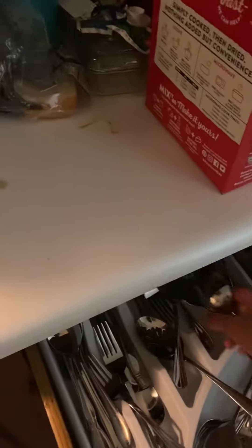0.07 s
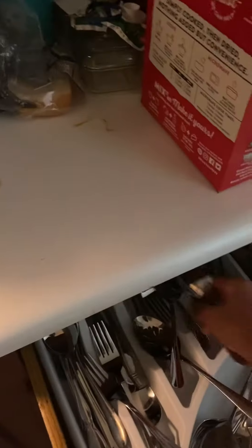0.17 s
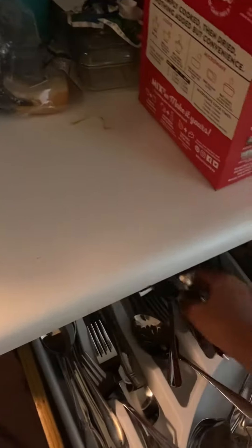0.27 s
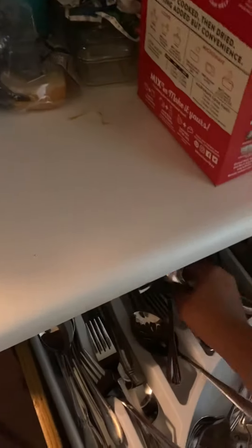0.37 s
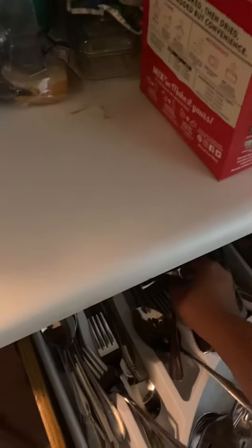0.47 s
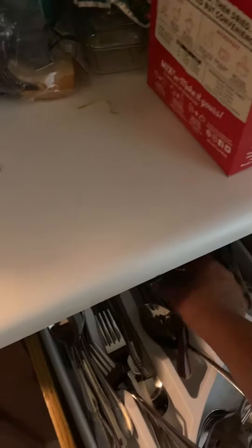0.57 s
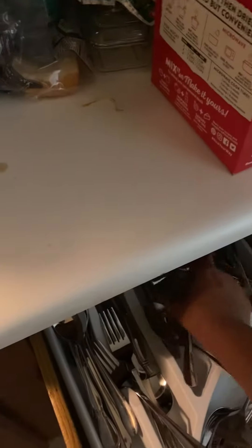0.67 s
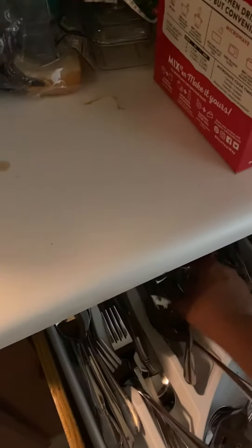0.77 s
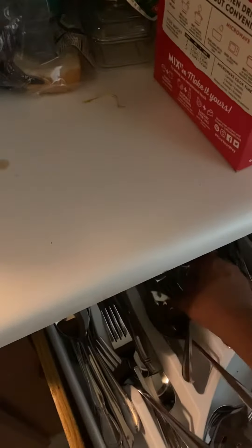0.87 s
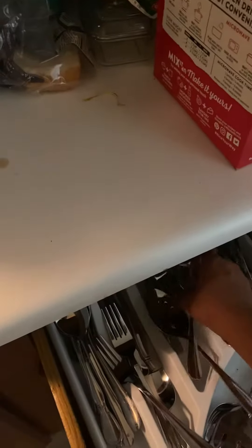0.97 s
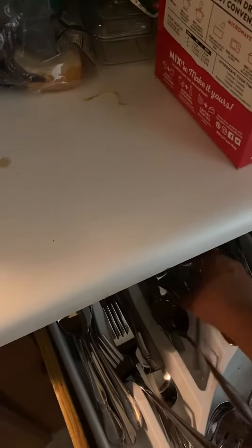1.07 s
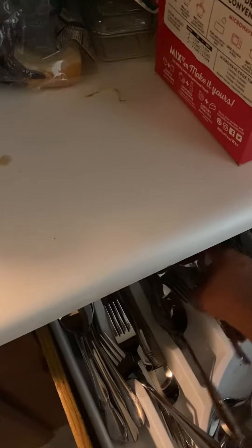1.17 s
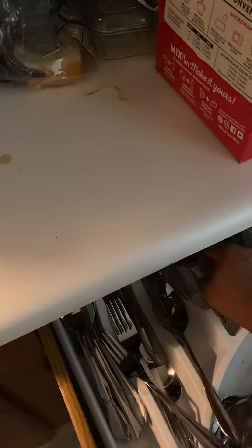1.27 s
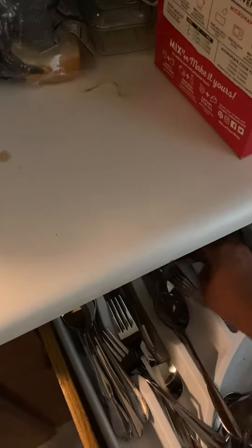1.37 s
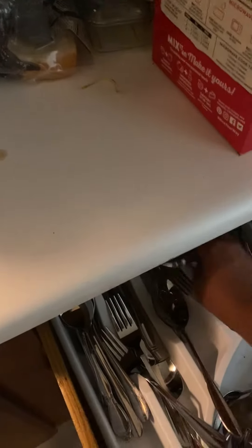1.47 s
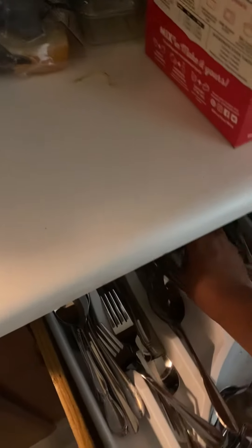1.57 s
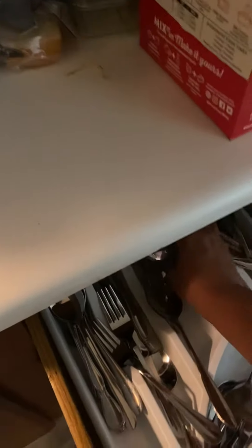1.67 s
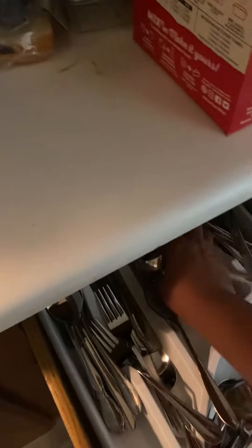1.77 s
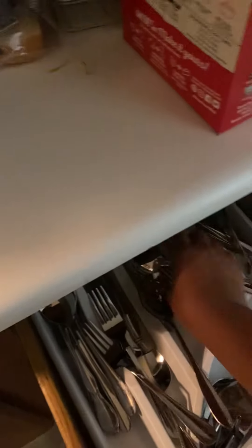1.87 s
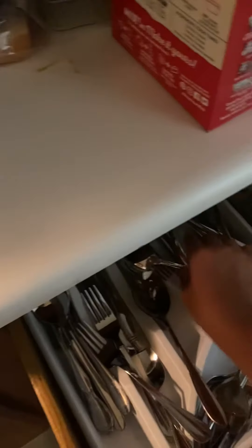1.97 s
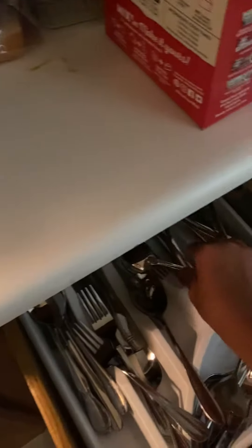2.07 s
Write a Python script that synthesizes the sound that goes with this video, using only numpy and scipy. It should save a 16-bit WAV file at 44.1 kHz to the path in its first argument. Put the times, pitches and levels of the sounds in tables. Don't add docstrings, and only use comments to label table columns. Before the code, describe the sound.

Cutlery rummaged in a drawer, close and bright. Faint sliding until 0.2 s, then a ringing piece and a sharp burst of clinks at 0.25-0.3 s. Lighter clinks and dull plastic tray knocks thin out, with an accent at 0.86 s. Clinking gathers from 1.1 s; the heavy flurry runs 1.55-1.83 s, then near-quiet and small clinks around 2.1 s. Low drawer wobble, short room reflections, faint fridge hum and hiss.

```python
import sys
import numpy as np
from scipy import signal
from scipy.fft import rfft, irfft, next_fast_len
from scipy.io import wavfile
from scipy.ndimage import uniform_filter1d, map_coordinates

SR = 44100
rng = np.random.default_rng(int(sys.argv[2]) if len(sys.argv) > 2 else 0)


def generate_wav(sig):
    pcm = np.round(np.clip(np.atleast_2d(sig).T, -1, 1) * 32767).astype(np.int16)
    wavfile.write(sys.argv[1], SR, pcm)


def boost_factor(decibels):
    exponent = np.asarray(decibels, float) / 20
    return 10 ** exponent


N = 94815

# start_s, peak_db, loudest_mode_hz, chatter_t60_s
EARLY_CLINKS = [(0.0107, -38, 5680, 0.11), (0.2476, -8.5, 3780, 0.08), (0.2629, -5, 6440, 0.11),
                (0.2771, -10.5, 6600, 0.18), (0.2955, -11.5, 6574, 0.1), (0.3215, -19.5, 4050, 0.042),
                (0.4173, -19.5, 5350, 0.04), (0.4578, -18.5, 7450, 0.05), (0.5217, -16.5, 5840, 0.21),
                (0.5807, -20, 6550, 0.12), (0.6282, -23, 5870, 0.11), (0.6435, -23, 5120, 0.17),
                (0.6953, -23.5, 7600, 0.06), (.715, -24.5, 5900, .15), (0.7906, -26.5, 6580, 0.16),
                (0.8387, -29, 5770, 0.28), (0.8623, -13.5, 6700, 0.11), (0.8834, -26, 6840, 0.22),
                (0.9986, -19.5, 5880, 0.12)]
# start_s, peak_db, loudest_mode_hz, chatter_t60_s
LATE_CLINKS = [(1.0939, -23.5, 4130, 0.063), (1.133, -18, 6560, 0.074), (1.152, -18.5, 5420, 0.077),
               (1.1835, -17.5, 3760, 0.032), (1.2778, -32.5, 6670, 0.016), (1.295, -20, 5000, 0.082),
               (1.3013, -15.5, 6030, 0.14), (1.316, -12.5, 5850, 0.034), (1.386, -20.5, 5300, 0.17),
               (1.409, -24, 5300, 0.14), (1.439, -18.5, 5220, 0.026), (1.465, -19, 5150, 0.062),
               (1.503, -17.5, 2710, 0.039), (1.508, -18, 6870, 0.25), (1.525, -24, 6800, 0.075),
               (1.548, -13.5, 6050, 0.22), (1.5552, -13.5, 3360, 0.078), (1.6087, -21.5, 7540, 0.049),
               (1.6577, -26, 3680, 0.61), (1.6849, -15, 5470, 0.13), (1.7056, -13, 5770, 0.22),
               (1.741, -12.5, 4420, 0.2), (1.7905, -10, 6620, 0.14), (1.808, -6, 5680, 0.073),
               (1.8277, -11, 5300, 0.043), (2.008, -48, 4230, 0.06), (2.098, -38, 3910, 0.41),
               (2.1225, -37.5, 3600, 0.057), (2.126, -27.5, 3570, 0.037)]
# start_s, peak_db, loudest_mode_hz
EARLY_KNOCKS = [(0.25, -15, 1737), (0.267, -14.5, 1020), (0.294, -17, 1870), (0.344, -17, 777),
                (0.361, -26, 716), (0.413, -16, 697), (0.459, -23.5, 1046), (0.526, -17, 1656),
                (0.587, -21, 1491), (0.628, -22, 1863), (0.643, -19, 1292), (0.696, -17.5, 1681),
                (.712, -23, 1400), (0.765, -47, 700), (0.795, -24, 1060), (0.839, -27.5, 834),
                (.861, -15, 905), (.874, -18.5, 1180), (0.882, -18, 1700), (1, -22.5, 1100)]
# start_s, peak_db, loudest_mode_hz
LATE_KNOCKS = [(1.078, -27, 734), (1.118, -29.5, 840), (1.16, -24, 675.5), (1.276, -30, 1580),
               (1.303, -16.5, 751), (1.324, -19, 1632), (1.388, -25, 1860), (1.394, -21.5, 1510),
               (1.419, -20.5, 1745), (1.467, -19, 1420), (1.509, -19.5, 910), (1.558, -10, 1785),
               (1.58, -12.5, 669.4), (1.653, -22.5, 1290), (1.66, -19, 1100), (1.682, -13.5, 1636),
               (1.705, -12.5, 1140), (1.742, -15, 869), (1.759, -10.5, 694.5), (1.792, -17.5, 559),
               (1.807, -12, 955.6), (1.829, -23, 832), (1.901, -32, 1316), (2.005, -39, 1736),
               (2.098, -31.5, 1595), (2.109, -31.5, 1620), (2.121, -25, 980), (2.127, -28, 1615)]
# start_s, pitch_hz, level_db, t60_s, free_s
FREE_RINGS = [(0.207, 6170, -30.5, 0.45, 0.035), (.222, 7550, -27.5, 0.53, 0.023),
              (.215, 3780, -40.5, .5, .035), (.25, 3783, -21, .9, .088), (.25, 3820, -19.5, .9, .088),
              (.25, 3884, -20.5, .8, .088), (.262, 5690, -17, .35, .07), (.878, 6472, -22, .65, .119),
              (1.744, 4200, -24, .6, .042), (.528, 8978, -33, .5, .035), (.263, 6596, -30, 0.41, 0.096),
              (.263, 6150, -16, 0.17, 0.074), (.263, 7617, -16, 0.068, .06),
              (.862, 6500, -32.5, 0.18, 0.017), (1.194, 6640, -43, 0.36, 0.03),
              (0.884, 8130, -30, .15, .03), (1.134, 6600, -36, 0.22, .018),
              (1.153, 3806, -22, 0.087, 0.015), (1.153, 5470, -13.5, 0.033, 0.0078),
              (1.185, 3770, -22, 0.069, 0.0083), (1.812, 5675, -24, 0.24, 0.17),
              (2.124, 3714, -30.5, 0.16, 0.0088)]
# centre_s, pitch_hz, level_db, half_length_s
TRAY_NUDGES = [(0.345, 804, -24.5, 0.0019), (0.419, 725, -23, 0.004), (.588, 1530, -22, 0.0018),
               (0.697, 1740, -29, 0.001), (1.087, 724, -32.5, .008), (1.142, 698, -31, 0.0043),
               (1.171, 747, -34, 0.0072), (1.059, 758, -37, 0.013), (1.305, 727, -22, 0.002),
               (1.76, 697, -21.5, 0.0056), (1.797, 549, -19.5, 0.0049), (1.811, 825, -21.5, 0.0048),
               (0.8696, 1005, -10.5, 0.00077), (.926, 1810, -22.5, 0.0015), (0.977, 1850, -37, 0.0013),
               (1.588, 664, -17, 0.0039), (2.071, 565, -42, 0.003), (2.083, 598, -31.5, 0.0025)]
# time_s, steel_db, tray_db
SLIDING = [(0, -43, -68), (.05, -58.5, -63), (.1, -42.5, -61), (0.202, -49.5, -71), (0.228, -32.5, -53.5),
           (.4, -46.5, -45.5), (.78, -57.5, -44.5), (1.08, -46, -41.5), (1.19, -38, -38.5),
           (1.26, -48.5, -45), (1.401, -39.5, -40.5), (1.701, -46.5, -34.5), (1.88, -44, -55),
           (1.99, -61.5, -61.5), (2.02, -59, -50), (2.07, -75, -63.5), (2.15, -55, -40.5)]
PILE_MODES = [3804, 4320, 5680, 6540, 8060, 9420, 9426]
TRAY_MODES = [735, 1000, 1600]
# frequency_hz, level_db
STEEL_COLOUR = [(2000, -7.5), (3800, -2), (4800, -5.5), (6500, 1), (8500, -8), (10500, -7), (15500, -27)]
# frequency_hz, level_db
PLASTIC_COLOUR = [(180, -6), (440, -19), (660, -3.5), (1750, -3.5), (2300, -11), (3500, -16)]
# pitch_hz, rms_db
FRIDGE_HUM = [(60, -59.5), (118, -58.5)]
# frequency_hz, level_db
HISS_COLOUR = [(30, -17), (60, -7), (250, -6), (600, -18.5), (1500, -43), (9000, -46), (11000, -56)]
# frequency_hz, lead_rad
PORT_LEAD = [(1000, -.15), (2150, -.9), (3100, -1.2), (5900, -.9), (7000, 1.2), (10000, 2), (12000, 2.3)]
# frequency_hz, difference_db
PORT_TILT = [(150, 0), (600, -3), (1500, -1), (9000, 0)]
# frequency_hz, t60_s
ROOM_DECAY = [(300, 0.56), (2000, 0.14), (10000, 0.1)]
# start_s, length_s, level_db
OPEN_TOP = [(0.234, 0.033, -12), (0.417, .022, -2), (0.857, 0.0097, -9), (1.002, .008, -8),
            (1.095, 0.012, 3), (1.14, 0.0096, -4), (0.615, 0.0097, 4), (0.685, 0.016, -5),
            (0.835, 0.01, -2), (1.172, .032, 0.5), (1.31, 0.04, -6.5), (1.786, .03, -4)]

FIRST_BLOW = 0.8
CHATTER_PER_S, SLIDE_PER_S = 2720, 4950
KNOCK_SETTLE_S = 0.14
SHAKE_DB, SHAKE_S, SHAKE_HZ = -20.5, 0.089, 66.6
HISS_DB, ROOM_DB = -53.5, -8.5
LOW_HZ = 150
STEEL_ASIDE, TRAY_ASIDE, SLIDE_ASIDE, BACKGROUND_ASIDE = 1.108, 0.72, 1, 0.79
MID_TOP_HZ, MID_CUT_DB = 10300, -32


def unit(x):
    return x / np.sqrt(np.mean(x ** 2) + 1e-20)


def along(points, hz):
    f, v = np.transpose(points)
    return np.interp(np.log(hz + 1), np.log(f + 1), v)


def filtered(x, response):
    m = next_fast_len(N + 8192)
    return irfft(rfft(x, m) * response(np.fft.rfftfreq(m, 1 / SR)), m)[..., :N]


def modes(hz, db, t60, rise_s, size):
    t = np.arange(size) / SR
    decay = boost_factor(db[:, None] - 60 * t / t60[:, None])
    tones = np.sin(2 * np.pi * hz[:, None] * t + hz[:, None])
    return (1 - np.exp(-t / rise_s)) ** 2 * (decay * tones).sum(0)


def contacts(per_s, spread_db, size):
    when, force = rng.random(size), rng.exponential(size=size)
    sign = np.sign(rng.standard_normal(size))
    present = np.clip((per_s / SR - when) * SR / 50, 0, 1)
    return present * boost_factor(spread_db * np.minimum(force, 3.5)) * sign


def body(shared, colour, t60, count):
    span = np.log([colour[0][0], colour[-1][0]])
    hz = np.exp(span[0] + np.ptp(span) * (np.arange(count) + rng.random(count)) / count)
    hz = np.r_[hz, shared * (1 + .025 * rng.standard_normal(len(shared)))]
    level = along(colour, hz) + 10 * np.log10(hz) + 4 * rng.standard_normal(len(hz))
    level += 3 * (np.arange(len(hz)) >= count)
    return hz, level - level.max(), t60 * np.exp(.5 * rng.uniform(-1.38, 1, len(hz)))


def blows(events, shared, colour, t60, lead_db, chatter_db, rise_s, count):
    out = np.zeros(N + SR)
    t = np.arange(SR // 5) / SR
    for s, db, hz, settle in events:
        f, level, life = body(shared, colour, t60, count)
        strike = modes(np.r_[f, hz], np.r_[level, lead_db], np.r_[life, t60], rise_s, size=1536)
        hit = np.pad(FIRST_BLOW * strike, (0, len(t) - 1))
        for third in range(3):
            fade = boost_factor(chatter_db - 60 * t / max(settle, .01))
            push = fade * contacts(CHATTER_PER_S / 3, 3.2, size=len(t))
            piece = modes(f[third::3], level[third::3] + 5.0, life[third::3], rise_s, size=1536)
            hit += signal.fftconvolve(push, piece)
        out[round(s * SR):][:len(hit)] += boost_factor(db) * hit / np.abs(hit[:SR // 80]).max()
    return out[:N]


def clinks():
    return blows([*EARLY_CLINKS, *LATE_CLINKS], PILE_MODES, STEEL_COLOUR, t60=.021,
                 lead_db=3, chatter_db=-10, rise_s=0.00087, count=80)


def free_rings():
    t = np.arange(N) / SR
    out = np.zeros(N)
    for s, hz, db, t60, free in FREE_RINGS:
        u = np.clip(t - s, 0, None)
        damping_db = 60 * np.clip(u - free, 0, None) / .04
        rise = 1 - np.exp(-u * hz / 8)
        out += boost_factor(db - 60 * u / t60 - damping_db) * rise * np.sin(2 * np.pi * hz * u)
    return out


def nudges():
    t = np.arange(N) / SR
    out = np.zeros(N)
    for s, hz, db, half in TRAY_NUDGES:
        out += boost_factor(db) * np.exp(-((t - s) / half) ** 2 / 2) * np.cos(2 * np.pi * hz * (t - s))
    return out


def knocks():
    events = [(*knock, KNOCK_SETTLE_S) for knock in [*EARLY_KNOCKS, *LATE_KNOCKS]]
    return blows(events, TRAY_MODES, PLASTIC_COLOUR, t60=.017,
                 lead_db=7, chatter_db=-17, rise_s=0.00032, count=30)


def slide(shared, colour, t60, count):
    out = np.zeros(N)
    for _ in range(4):
        grains = contacts(SLIDE_PER_S / 4, 4.7, size=N)
        ring = modes(*body(shared, colour, t60, count), 0.00039, size=3072)
        out += signal.fftconvolve(grains, ring)[:N]
    return unit(out)


def rummage():
    s, steel_db, tray_db = np.transpose(SLIDING)
    t = np.arange(N) / SR
    steel = boost_factor(np.interp(t, s, steel_db)) * slide(PILE_MODES, STEEL_COLOUR, 0.062, 90)
    tray = boost_factor(np.interp(t, s, tray_db)) * slide(TRAY_MODES, PLASTIC_COLOUR, 0.032, 40)
    return steel + tray


def shake(tray):
    power = uniform_filter1d(tray ** 2, int(SHAKE_S * SR), origin=int(SHAKE_S * SR / 3))
    effort = np.sqrt(np.abs(power))
    wobble = filtered(rng.standard_normal(N), lambda hz: 1 / (1 + (3 * np.log((hz + 1) / SHAKE_HZ)) ** 2))
    return boost_factor(SHAKE_DB) * effort * unit(wobble)


def room(x):
    hz, t, z = signal.stft(rng.standard_normal((2, SR // 3)), SR, nperseg=256)
    tail = signal.istft(z * boost_factor(-60 * t / along(ROOM_DECAY, hz)[:, None]), SR, nperseg=256)[1]
    tail = tail / np.linalg.norm(tail[0])
    delayed = np.pad(x, (200, 0))[None]
    wet = signal.fftconvolve(delayed, tail, axes=1)[:, :N]
    return boost_factor(ROOM_DB) * filtered(wet, lambda hz: hz / (hz + 700))


def drift():
    return map_coordinates(rng.standard_normal(size=40), [np.arange(N) / SR * 9])


def kitchen():
    t = np.arange(N) / SR
    hum = np.zeros(N)
    for hz, db in FRIDGE_HUM:
        hum += np.sqrt(2) * boost_factor(db + 2.5 * drift()) * np.sin(2 * np.pi * hz * t + 0.34 * drift())
    hiss = filtered(rng.standard_normal(N), lambda hz: boost_factor(along(HISS_COLOUR, hz)))
    return hum + boost_factor(HISS_DB) * unit(hiss)


def at_ports(x, aside):
    side = np.array([[.5], [-.5]])
    return filtered(x, lambda hz: boost_factor(side * along(PORT_TILT, hz))
                    * np.exp(1j * aside * side * along(PORT_LEAD, hz)))


def scene():
    tray = knocks()
    parts = np.array([clinks() + free_rings() + nudges(), tray, rummage()])
    parts = filtered(parts, lambda hz: 1 / (1 + (LOW_HZ / (hz + 1)) ** 4))
    asides = [STEEL_ASIDE, TRAY_ASIDE, SLIDE_ASIDE]
    near = sum(at_ports(part, aside) for part, aside in zip(parts, asides))
    background = at_ports(shake(tray) + kitchen(), BACKGROUND_ASIDE)
    return near + background + room(parts.sum(0))


def low_pass(x):
    return signal.sosfilt(signal.butter(12, 15760, fs=SR, output="sos"), x)


def record(dry):
    t = np.arange(N) / SR
    mid = filtered(dry.mean(0), lambda hz: 1 / (1 + (46 / (hz + 1)) ** 6))
    top = filtered(mid, lambda hz: 1 / (1 + (MID_TOP_HZ / (hz + 50)) ** 120))
    kept = np.full(N, boost_factor(MID_CUT_DB))
    for s, span, db in OPEN_TOP:
        kept += boost_factor(db) * np.clip(np.minimum(t - s, s + span - t) / 0.0029, 0, 1)
    mid = mid - top * (1 - kept)
    side = (dry[0] - dry[1]) / 2
    return low_pass(np.tanh(np.array([mid + side, mid - side])))


dry = scene()
out = record(dry)
generate_wav(out)
```